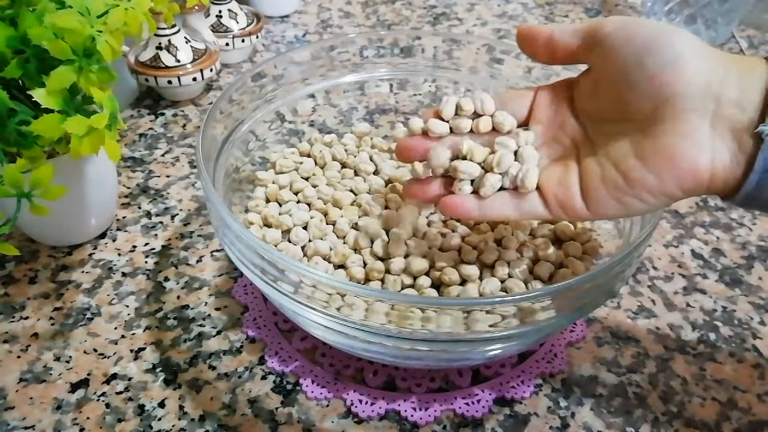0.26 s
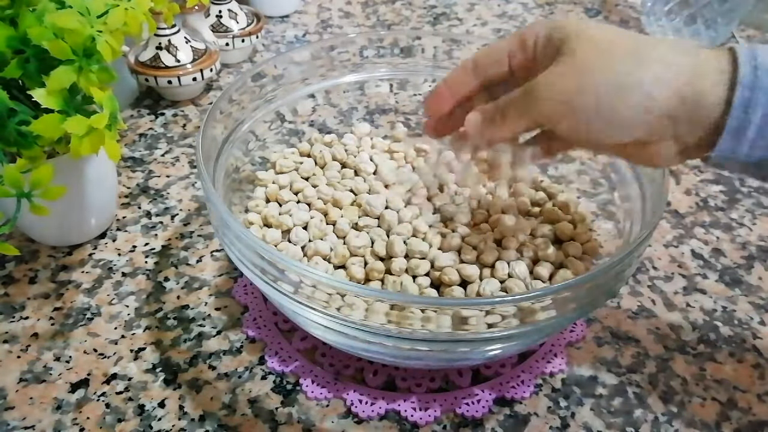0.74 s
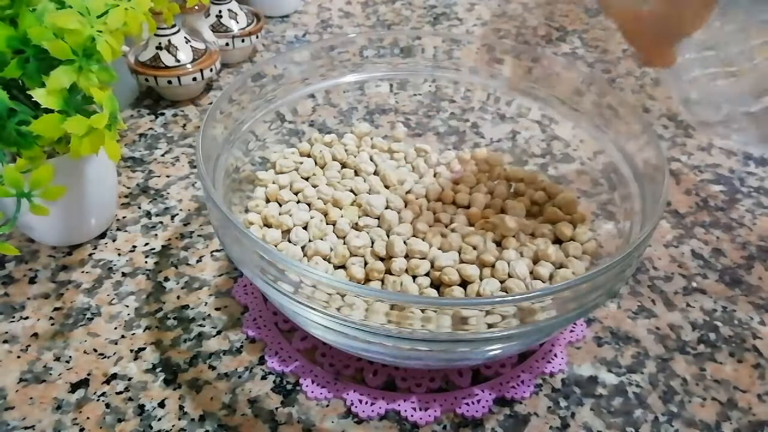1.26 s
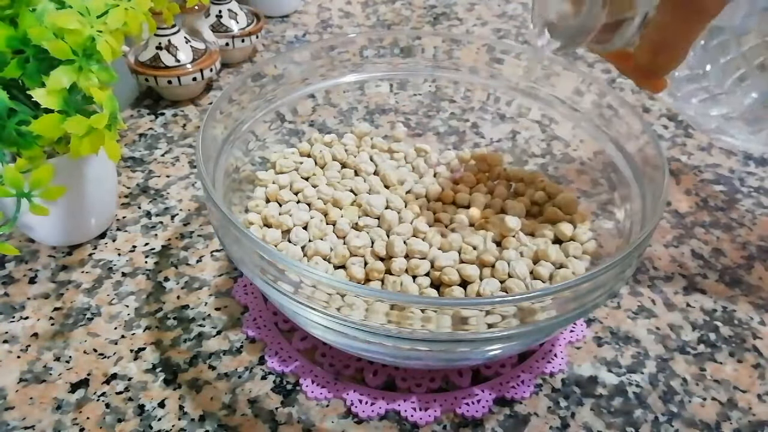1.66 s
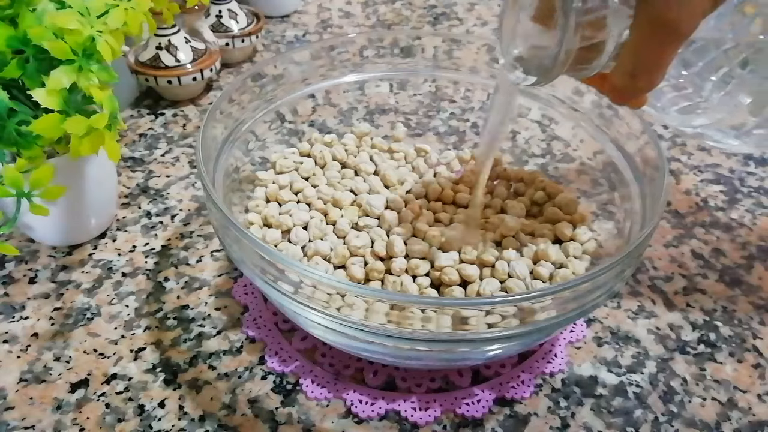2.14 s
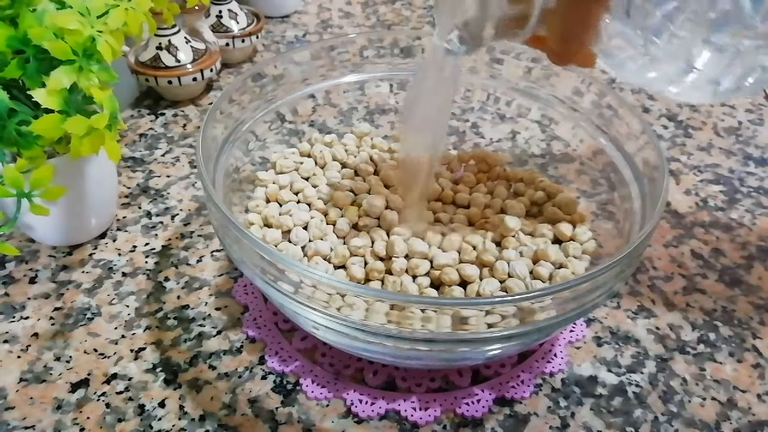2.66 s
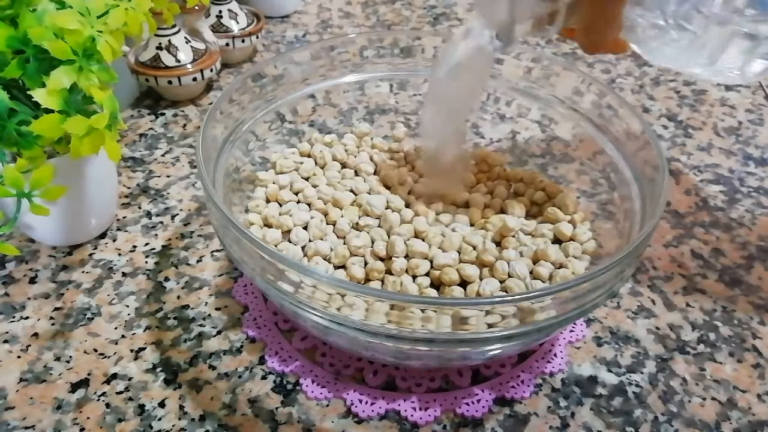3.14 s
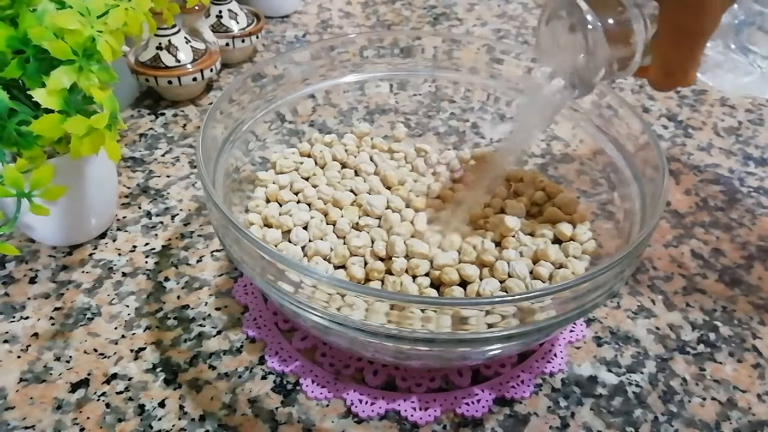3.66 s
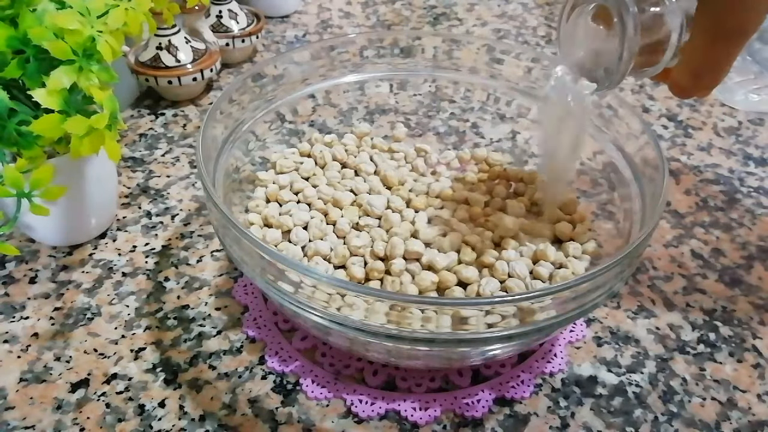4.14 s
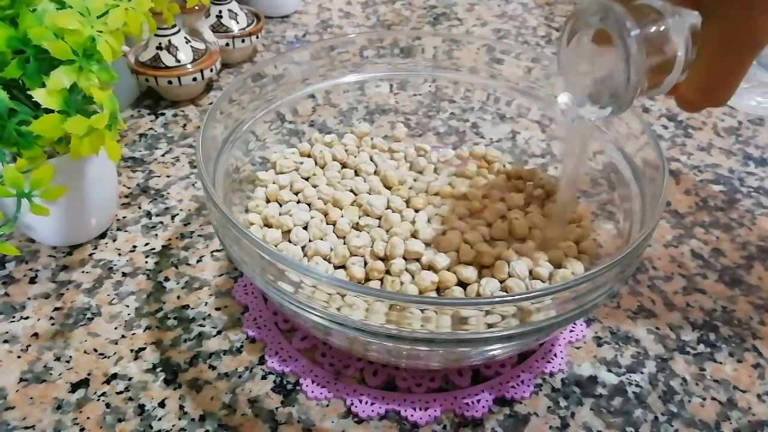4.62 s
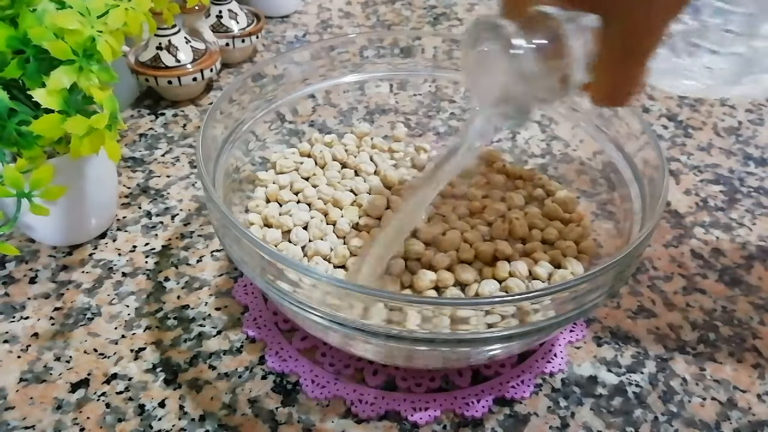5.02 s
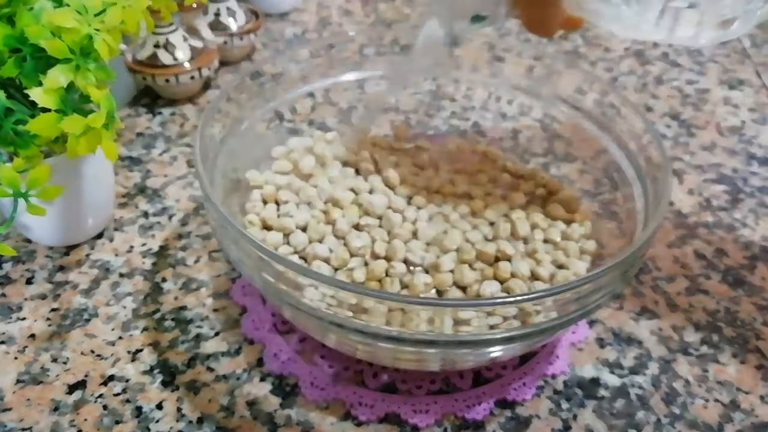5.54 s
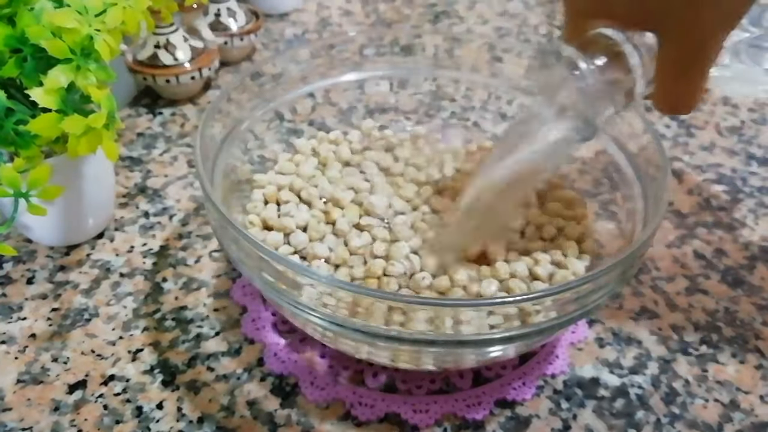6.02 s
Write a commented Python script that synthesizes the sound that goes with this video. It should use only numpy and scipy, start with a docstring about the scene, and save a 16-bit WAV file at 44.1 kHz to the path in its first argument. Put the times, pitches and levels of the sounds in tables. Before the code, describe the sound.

In a small quiet kitchen, a handful of dried chickpeas drops with short dry rattles into a glass bowl. After near silence, a plastic bottle begins to glug, knocks the rim with a bright ringing clink, and water patters and fizzes over the peas in quick pulses, with sharp clicks of shifting peas. Close stereo pickup, treble leaning strongly left.

```python
"""Over faint hiss, dried chickpeas drop from a hand into a glass bowl: short coloured noise bursts.
Water from a plastic bottle then patters, fizzes and burbles on them: random grains, swelling in slugs.
The bottle glugs as air gulps in (throbs, pops, rising gurgles); wet peas shift with clicks.
It knocks on the rim in a few quick bounces: noise for the bottle, ringing modes for the bowl.
A two-port microphone in a small quiet kitchen hears the treble mostly on the left."""
import sys
import numpy as np
from scipy import signal
from scipy.fft import rfft, irfft, next_fast_len
from scipy.io import wavfile
from scipy.ndimage import uniform_filter1d

SR = 44100
rng = np.random.default_rng(int(sys.argv[2]) if len(sys.argv) > 2 else 0)


def dump(signal):
    """Clip the signal to [-1, 1] and save it as 16-bit WAV at the path in sys.argv[1]."""
    limited = np.clip(np.atleast_2d(signal).T, -1, 1)
    pcm = np.round(limited * 32767).astype(np.int16)
    wavfile.write(sys.argv[1], SR, pcm)


N = 277389
TIME = np.arange(N) / SR   # s

# air gulps through the bottle neck:
# (t/s, pop relative level/dB, pop f/Hz, snap relative level/dB, gurgle relative level/dB)
GULPS = [(1.9212, -46.5, 264, -37, -53), (2.1908, -45, 295, -37, -65), (2.715, -37, 326, -36, -56),
         (2.9843, -38.5, 298, -32.5, -53), (3.199, -37, 295, -27.5, -49), (3.408, -46, 295, -32.5, -58),
         (3.641, -37.5, 300, -45, -54), (3.8457, -34.5, 284, -30, -49), (4.052, -40, 285, -55, -53.5),
         (4.302, -35.5, 230, -34.5, -52.5), (4.55, -33.5, 129, -48, -48.5), (4.804, -42.5, 202, -53, -61),
         (5.0319, -41.5, 348, -28, -66), (5.258, -33, 263, -39, -50.5), (5.538, -41, 202, -37.5, -57),
         (5.787, -45, 130, -58, -64), (5.943, -36.5, 384, -50, -77), (6.0664, -39, 413, -51, -53.5),
         (6.161, -30, 440, -36, -48), (6.2875, -31.5, 457, -22.5, -60)]
# slugs of water that land on the peas after the gulps:
# (t/s, length/s, patter relative level/dB, bubbling relative level/dB, bubble f/Hz)
WATER_SLUGS = [(2.777, 0.016, -52, -82, 1870), (2.854, 0.086, -49, -67, 1900),
               (3.021, 0.21, -47, -59.5, 1780), (3.274, 0.15, -43, -61, 1810),
               (3.514, 0.11, -45.5, -68, 1750), (3.637, 0.203, -46, -65.5, 1730),
               (3.926, 0.15, -48, -61, 1720), (4.111, 0.21, -49.5, -63.5, 1910),
               (4.383, .12, -45, -51.5, 1480), (4.627, 0.194, -50.5, -56, 1473),
               (4.914, 0.086, -52.5, -57, 2300), (5.151, 0.12, -40.5, -44.5, 1420),
               (5.32, 0.13, -42.5, -51, 1570), (5.532, 0.13, -47, -61, 1780),
               (5.66, 0.17, -48.5, -50.5, 1660), (5.82, 0.092, -43, -49.5, 2870),
               (5.982, 0.05, -44, -49.5, 2100), (6.089, 0.056, -44.5, -53, 2100),
               (6.193, 0.13, -41.5, -51, 2900)]
# colour of water and wet peas: (f/Hz, relative level/dB per Hz)
WET_SPECTRUM = [(410, -21), (700, -11), (1000, -13), (1270, -10), (1550, -26), (1770, -37), (2530, -12),
                (2880, -13), (3280, -10.5), (4690, -8.5), (6310, -3), (7820, -1), (10700, -5), (11400, -12),
                (12000, -26), (15600, -82), (22000, -120)]
# bounces of the bottle neck on the rim: (t/s, relative level/dB)
RIM_BOUNCES = [(2.3742, -2), (2.3777, -7), (2.3805, 1), (2.3835, -17)]


def from_db(db):
    """Decibels to gain."""
    return 10 ** (np.asarray(db) / 20)


def rms_one(x):
    """Scale to rms 1."""
    return x / np.sqrt(np.mean(x ** 2) + 1e-20)


def at_hz(points, hz):
    """Read a table on a log-frequency axis."""
    f, value = np.transpose(points)
    return np.interp(np.log(np.maximum(hz, 1)), np.log(f), value)


def add(out, s, sound):
    """Mix a short sound in at time s."""
    start = int(round(s * SR))
    out[start:start + len(sound)] += sound[:max(N - start, 0)]


def colour(x, spectrum, size=4096):
    """Causal (minimum-phase) filter with the given spectrum; white noise keeps its power."""
    gain = rms_one(from_db(at_hz(spectrum, np.arange(size // 2 + 1) * SR / size)))
    cepstrum = irfft(np.log(gain))
    # fold the cepstrum forward in time to get minimum phase
    cepstrum[1:size // 2] *= 2
    cepstrum[size // 2 + 1:] = 0
    response = irfft(np.exp(rfft(cepstrum)))
    return signal.oaconvolve(x, response)[:len(x)]


def band(x, low_hz, high_hz):
    """Gentle band-pass."""
    return signal.sosfilt(signal.butter(2, [low_hz, high_hz], "band", fs=SR, output="sos"), x)


def peak(x, hz, width_hz):
    """The part of a sound inside one resonance, gain 1 on top."""
    return signal.lfilter(*signal.iirpeak(hz, hz / width_hz, fs=SR), x)


def ring(clicks, hz, t60):
    """A unit click sets a decaying sine of starting height 1 ringing."""
    radius = from_db(-60 / (t60 * SR))
    w = 2 * np.pi * hz / SR
    return signal.lfilter([0, np.sin(w)], [1, -2 * radius * np.cos(w), radius * radius], clicks + 1e-18)


def fade(t, t60):
    """Exponential decay, 60 dB down at t60 seconds."""
    return np.exp(-np.log(1000) * t / t60)


def burst(t60):
    """Noise that dies away, starting at rms 1."""
    t = TIME[:min(int(t60 * SR) + 2, SR)]
    return rng.standard_normal(len(t)) * fade(t, t60)


def evened(x, size=4000):
    """Hold the rms over about a tenth of a second near 1."""
    power = np.maximum(uniform_filter1d(x ** 2, size), 0)
    return x / np.sqrt(power + 1e-3 * np.mean(x ** 2))


def drift(rate):
    """Slow chance with spread 1, reaching a new value `rate` times a second."""
    return np.interp(TIME * rate, np.arange(4000), rng.standard_normal(4000))


def uneven_sizes(spread_db):
    """Impact heights with a long tail of strong ones."""
    return from_db(spread_db * np.minimum(rng.exponential(1, N), 4))


def grains(per_s, spread_db, pitches, cycles, weight):
    """Random impacts of uneven size, each ringing a few cycles at one of the pitches; slow level evened."""
    sizes = uneven_sizes(spread_db) * rng.choice([-1, 1], N)
    born = rng.random(N) < per_s / SR
    dealt = rng.integers(0, len(pitches), N)
    out = np.zeros(N)
    for k, hz in enumerate(pitches):
        at = np.flatnonzero(born & (dealt == k))
        clicks = np.zeros(N)
        clicks[at] = sizes[at] * weight(at / SR, hz)
        out += ring(clicks, hz, cycles / hz) * np.sqrt(hz)
    return evened(out)


def glides(rows, bend, droop_db, wobble, uneven_db, count=9):
    """Air pockets ring like springs; pitch bends as they change size, and sloshing makes them waver."""
    out = np.zeros(N)
    knots = np.linspace(0, 1, count)
    for s, db, start_hz, end_hz, length in rows:
        u = np.linspace(0, 1, int(length * SR))   # share of the glide that has passed
        in_pitch, in_level = (np.interp(u, knots, row) for row in rng.standard_normal((2, count)))
        hz = (start_hz + (end_hz - start_hz) * u ** bend) * np.exp(wobble * in_pitch * u)
        level = from_db(db - droop_db * u + uneven_db * in_level)
        edges = np.clip(u * 20, 0, 1) * np.clip((1 - u) * 5, 0, 1)
        add(out, s, level * edges * np.sin(2 * np.pi * np.cumsum(hz) / SR))
    return out


def background(level_db):
    """Faint hiss, different in each channel, over a shared low murmur of the room."""
    # colour of the background: (f/Hz, relative level/dB per Hz)
    hiss_spectrum = [(15, -32), (25, -2.5), (102, -4.5), (180, -3.5), (210, -9.5), (478, -8.5), (529, -10),
                     (819, -16.5), (1270, -15.5), (2660, -19), (5470, -15), (6540, -15), (7440, -7),
                     (9860, -21), (11500, -44.5), (15000, -85.5), (22000, -120)]
    # the background sinks away and comes back: (t/s, relative level/dB)
    hiss_course = [(0, -71.5), (1.12, -74.5), (1.3, -95), (1.6, -102), (1.785, -110), (1.795, -74),
                   (6.29, -65.5)]
    noise = rng.standard_normal((3, N))
    low_pass = signal.butter(2, 900, fs=SR)
    high_pass = signal.butter(2, 900, "high", fs=SR)
    murmur = signal.lfilter(*low_pass, noise[2])
    channels = []
    for own in noise[:2]:
        hiss = np.sqrt(2) * signal.lfilter(*high_pass, own)
        channels.append(colour(murmur + hiss, hiss_spectrum))
    return np.array(channels) * from_db(level_db + np.interp(TIME, *np.transpose(hiss_course)))


def shower(s, length, db, scatter_db, count):
    """Peas fall one after another at uneven moments: rows of (t/s, relative level/dB)."""
    chance = rng.uniform(-1, 1, (count, 2))
    times = s + length * (np.arange(count) + .5 + .5 * chance[:, 0]) / count
    return list(zip(times, db + scatter_db * chance[:, 1]))


def peas(dry_db, dry_t60, wet_db, wet_t60, pitched_db, ring_t60):
    """Dry peas land with a short rattle of noise; wet ones click and ring for an instant."""
    # the hand lets peas go in little showers: (t/s, length/s, relative level of each pea/dB)
    handfuls = [(0.264, 0.31, -52.5), (0.896, 0.091, -54), (0.986, .07, -34)]
    # single dry peas landing: (t/s, relative level/dB)
    single_drops = [(0.3799, -34.5), (0.4468, -44.5), (0.9912, -34), (1.0055, -30.5), (1.108, -36.5)]
    # the loudest knocks of wet peas under the stream: (t/s, relative level/dB, centre f/Hz)
    wet_knocks = [(1.964, -37, 7630), (2.2169, -34, 6000), (2.7834, -29.5, 7280), (2.8759, -38, 7240),
                  (2.9474, -30.5, 5060), (3.118, -30.5, 8400), (3.2008, -24.5, 7580), (3.2928, -19, 8220),
                  (3.4033, -27, 7720), (3.5367, -31, 7220), (3.6238, -26, 7450), (3.6615, -21.5, 7870),
                  (3.7539, -30, 7340), (3.846, -28.5, 7800), (3.996, -27, 7370), (4.156, -26, 6330),
                  (4.2873, -28.5, 8230), (4.3869, -23.5, 8410), (4.637, -33.5, 6860), (4.6538, -20.5, 8230),
                  (4.7536, -21.5, 7760), (4.957, -25.5, 7280), (5.1357, -27.5, 7420), (5.214, -25.5, 7460),
                  (5.439, -21.5, 7200), (5.6257, -22.5, 6930), (5.7919, -25.5, 8530),
                  (5.8456, -21.5, 10500), (5.9512, -21.5, 5700), (6.1929, -27, 7500)]
    # colour of dry peas on glass: (f/Hz, relative level/dB per Hz)
    dry_spectrum = [(100, -36), (250, -13.5), (600, -21), (1400, -24.5), (2400, -24), (3200, -11.5),
                    (4000, -16.5), (6300, -11.5), (7350, 1), (8500, -9.5), (10700, -15.5), (12000, -34.5)]
    dry_peas, wet_peas = np.zeros((2, N))
    falling = [pea for row in handfuls for pea in shower(*row, scatter_db=0.5, count=9)]
    for s, db in single_drops + falling:
        add(dry_peas, s, from_db(db + dry_db) * burst(dry_t60))
    for s, db, hz in wet_knocks:
        click = np.pad(burst(wet_t60), (0, SR // 50))   # room for the ring to die away
        tone = ring(click, hz, ring_t60)
        tone = tone * click.std() / tone.std()
        add(wet_peas, s, from_db(db + wet_db) * (click + from_db(pitched_db) * tone))
    return colour(dry_peas, dry_spectrum) + colour(wet_peas, WET_SPECTRUM)


def flow():
    """Strength of patter and of bubbling: the trickle plus slugs that swell, hold and drain away."""
    # the thin stream that runs on between the slugs: (t/s, patter relative level/dB)
    trickle = [(1.9, -105), (1.95, -76), (2.5, -60.5), (2.9, -54), (4.6, -54), (6.29, -53.5)]
    attack_s, release_s = 0.021, 0.033
    # strengths add as power
    patter = from_db(np.interp(TIME, *np.transpose(trickle), left=-np.inf)) ** 2
    bubbling = patter * from_db(-11.5) ** 2   # the trickle bubbles more softly than it patters
    for s, length, patter_db, bubbling_db, _ in WATER_SLUGS:
        swell = np.clip((TIME - s) / attack_s, 0, 1)
        drain = np.exp(-np.clip(TIME - s - length, 0, 1) / release_s)
        patter = patter + (from_db(patter_db) * swell * drain) ** 2
        bubbling = bubbling + (from_db(bubbling_db) * swell * drain) ** 2
    return np.sqrt(patter), np.sqrt(bubbling)


def burble(per_s, spread_db, octaves, cycles):
    """Bubbles crowd around the pitch that the pool favours at each moment."""
    start, length, *_, pool_hz = np.transpose(WATER_SLUGS)

    def favoured(s, hz):
        """Weight of a bubble by its distance in pitch from the pool."""
        centre_hz = np.interp(s, start + length / 2, pool_hz)
        return 1 / (1 + (np.log2(hz / centre_hz) / octaves) ** 2)

    bubbles = grains(per_s, spread_db, np.geomspace(1170, 3600, 36), cycles, favoured)
    return evened(band(bubbles, 880, 5300))


def stream(patter_db, crackle_db, bubbling_db, wash_db, clump_db, clump_rate):
    """Droplets crackle on the peas, tiny bubbles fizz, larger ones burble."""
    # finer spray when the stream nears the glass:
    # (t/s, gain of the top treble/dB, gain of the middle treble/dB)
    spray_course = [(2.6, -2.5, 1), (4.0, -10, -1.5), (5.2, -13.5, 4), (5.75, -6, 4), (5.88, 6, 3),
                    (6.29, -3, -4)]
    patter_flow, bubbling_flow = flow()
    busy = np.sqrt(patter_flow / patter_flow.max())   # a stronger splash throws more droplets
    fizz = grains(2400 * busy, spread_db=4.0, pitches=np.linspace(2200, 11600, 44), cycles=79,
                  weight=lambda s, hz: 1)
    droplets = (rng.random(N) < 700 * busy / SR) * rng.standard_normal(N) * uneven_sizes(5.8)
    patter = from_db(patter_db) * evened(colour(fizz, WET_SPECTRUM))
    patter = patter + from_db(crackle_db) * evened(colour(droplets, WET_SPECTRUM))
    patter = patter * from_db(clump_db * drift(clump_rate))   # the jet breaks into lumps
    wash = from_db(wash_db) * colour(rng.standard_normal(N), WET_SPECTRUM)
    splash = patter_flow * (patter + wash)
    s, top_db, middle_db = np.transpose(spray_course)
    splash = splash + (from_db(np.interp(TIME, s, top_db)) - 1) * peak(splash, 10800, 2400)
    splash = splash + (from_db(np.interp(TIME, s, middle_db)) - 1) * peak(splash, 3500, 2400)
    bubbles = burble(2000 * busy, spread_db=5.0, octaves=0.53, cycles=20)
    return splash + bubbling_flow * from_db(bubbling_db) * bubbles


def bottle_air(s):
    """Throb and gurgle of the air in the bottle at the tilt of that moment."""
    # how far the bottle is tipped: (t/s, tilt/0-1)
    tilt_course = [(1.92, 0.01), (2.2, 0.34), (2.9, 0.5), (4.05, 0.59), (4.3, 0.8), (5.79, 0.81), (5.94, 1)]
    # over most of its tipping, a steeper bottle gurgles shorter and higher: (tilt/0-1, throb relative
    # level/dB, throb length/s, throb top f/Hz, gurgle length/s, gurgle start f/Hz, gurgle end f/Hz)
    air_by_tilt = [(0, -80, 0.034, 109, 0.197, 113.3, 153), (0.507, -55, 0.199, 81.3, .076, 177, 528),
                   (0.806, -46.5, .04, 110, .04, 200, 330), (1, -46, 0.015, 198, 0.026, 243, 563)]
    tilts, *columns = np.transpose(air_by_tilt)
    tilt = np.interp(s, *np.transpose(tilt_course))
    return [np.interp(tilt, tilts, column) for column in columns]


def rounded(pop, edge_hz):
    """The neck takes the top off a pop and lets it ring for an instant."""
    edge_hz = np.clip(edge_hz, 400, 2000)
    return signal.sosfilt(signal.cheby1(4, 1, edge_hz, fs=SR, output="sos"), pop)


def glugs(neck_hz, neck_t60, low_share, spray_db, edge_ratio):
    """The air in the bottle throbs upward in pitch until a gulp breaks through the neck with a pop."""
    out, snaps, spray = np.zeros((3, N))
    t = np.arange(-SR // 4, SR // 50) / SR   # s from the gulp
    for s, pop_db, pop_hz, snap_db, _ in GULPS:
        swell_db, swell_s, top_hz, *_ = bottle_air(s)
        swell = np.exp(np.minimum(t, 0) / swell_s)
        turns = np.cumsum(top_hz * (low_share + (1 - low_share) * swell ** 2)) / SR
        cut_off = np.exp(-np.maximum(t, 0) / 0.00092)
        throb = swell * cut_off * -np.sin(2 * np.pi * (turns - turns[SR // 4]))
        w = 2 * np.pi * pop_hz * t
        pop = -2 * w / (1 + w * w) * np.exp(-(w / 5) ** 2)   # pressure up, then sharply down
        pop = rounded(pop, edge_ratio * pop_hz)
        add(out, s + t[0], from_db(swell_db) * throb + from_db(pop_db) * pop)
        add(snaps, s, from_db([snap_db]))
        add(spray, s, from_db(snap_db + spray_db) * burst(0.0047))
    return out + ring(snaps, neck_hz, neck_t60) + colour(spray, WET_SPECTRUM)


def gurgles():
    """Each gulp leaves an air pocket that rings upward in pitch, ever faster."""
    pockets = []
    for s, *_, db in GULPS:
        *_, length, start_hz, end_hz = bottle_air(s)
        pockets.append((s + 0.0021, db, start_hz, end_hz, length))
    return glides(pockets, bend=2.6, droop_db=2.5, wobble=.07, uneven_db=2.2)


def knock(crack_db, crack_t60, clatter_db, clatter_t60):
    """The bottle bounces on the rim: a crack at each bounce and one shudder of its thin wall."""
    # colour of the cracks: (f/Hz, relative level/dB per Hz)
    crack_spectrum = [(35, -16), (60, -15.5), (265, -4), (370, -13.5), (643, -6.5), (938, -15.5),
                      (1090, -6.5), (1560, -20.5), (1950, -12), (2720, -24), (4230, -15), (6310, -19),
                      (7700, -5), (10300, -21.5), (12000, -37), (15600, -73), (22000, -120)]
    # colour of the shuddering wall: (f/Hz, relative level/dB per Hz)
    clatter_spectrum = [(29, -34), (50, -22), (128, -5), (343, -25), (637, -9), (1300, -34), (1520, -52),
                        (1960, -13.5), (2770, -33), (2960, -18), (6170, -50), (7940, -18.5), (12000, -37),
                        (15600, -56), (22000, -120)]
    crack, clatter = np.zeros((2, N))
    for s, db in RIM_BOUNCES:
        add(crack, s, from_db(db + crack_db) * burst(crack_t60))
    add(clatter, RIM_BOUNCES[0][0], from_db(clatter_db) * burst(clatter_t60))
    return colour(crack, crack_spectrum) + colour(clatter, clatter_spectrum)


def glass_bowl():
    """The bowl, struck at the second bounce, rings on its stand as a sum of decaying modes."""
    # modes of the glass: (f/Hz, relative level/dB, t60/s)
    bowl_modes = [(64.7, -40, 0.76), (125, -32, 0.45), (240, -42, 0.37), (322, -28, 0.079),
                  (419, -35, 0.17), (446, -37.5, 0.16), (630, -54, 0.3), (750, -46, 0.26),
                  (1008, -40, 0.26), (1913, -27.5, 0.33), (2906, -43.5, 0.48), (3480, -59, 0.22),
                  (3600, -62, 0.24), (4170, -45.5, 0.41), (4540, -54, 0.098), (5570, -40, 0.26),
                  (5600, -41, 0.14), (6890, -32, 0.14), (7040, -44, 0.39), (8070, -29.5, 0.14),
                  (7840, -49.5, 0.77), (8650, -27, 0.13), (9700, -42, 0.15), (10530, -34.5, 0.15)]
    blow = np.zeros(N)
    add(blow, RIM_BOUNCES[1][0], np.ones(1))
    out = np.zeros(N)
    for k, (hz, db, t60) in enumerate(bowl_modes):
        out += ring(blow, hz, t60) * from_db(db) * (-1) ** k   # neighbours start in opposite phase
    return out


def surface_bubbles():
    """Single bubbles under the stream ring as short gliding sines, some up and some down."""
    # (t/s, relative level/dB, start f/Hz, end f/Hz, length/s)
    single_bubbles = [(3.093, -37.5, 1357, 1162, 0.022), (3.414, -34, 1735, 1795, 0.019),
                      (3.423, -32, 1910, 1660, 0.0066), (4.806, -40.5, 1810, 1660, 0.016),
                      (5.033, -41.5, 2310, 2350, 0.0091), (5.259, -38, 1220, 1160, 0.013),
                      (5.777, -44, 1210, 1620, 0.0062), (5.865, -36.5, 2190, 2380, 0.0068),
                      (6.128, -35, 2620, 3330, 0.01)]
    return glides(single_bubbles, bend=0.81, droop_db=6, wobble=0.018, uneven_db=2.0)


def kitchen(x, bowl_db, bowl_t60, room_db):
    """Quick reflections inside the bowl, then a room tail that dies soonest in the high treble."""
    # decay of the room: (f/Hz, t60/s)
    room_decay = [(100, 0.56), (500, 0.72), (2000, 0.38), (8000, 0.34), (12000, 0.073)]
    t = TIME[:SR // 2]
    edges = np.geomspace(50, 13000, 9)   # Hz, borders of the decay bands
    tail = np.zeros(len(t))
    for low, high in zip(edges, edges[1:]):
        t60 = at_hz(room_decay, np.sqrt(low * high))
        tail += band(rng.standard_normal(len(t)), low, high) * fade(t, t60)
    tail = tail * np.minimum(t / 0.013, 1)
    early = band(rng.standard_normal(len(t)) * fade(t, bowl_t60) * (t > .0005), 980, 14000)
    early = early + 0.46 * band(early, 1740, 4040)   # the glass wall throws the middle range back best
    response = from_db(room_db) * tail / np.linalg.norm(tail)
    response = response + from_db(bowl_db) * early / np.linalg.norm(early)
    return x + signal.fftconvolve(x, response)[:N]


def ports(left, right, lag_s):
    """The left port faces the bowl; the right is shaded in the treble and hears it a little later."""
    # (f/Hz, left minus right level/dB)
    balance = [(60, 2), (190, 1), (620, 7), (1120, 7.5), (2010, 14), (3610, 21.5), (6470, 26.5),
               (7800, 31.5), (11000, 19)]
    size = next_fast_len(N + SR // 10)
    hz = np.arange(size // 2 + 1) * SR / size
    shade = from_db(-at_hz(balance, hz))
    delay = np.exp(-2j * np.pi * hz * lag_s)
    gains = 2 / (1 + shade) * np.array([np.ones_like(hz), shade * delay])   # the two gains sum to 2
    return irfft(rfft(np.array([left, right]), size) * gains, size)[:, :N]


def scene():
    """Everything but the background sounds at the bowl, in the kitchen."""
    clicks = peas(dry_db=-9.5, dry_t60=0.051, wet_db=-9, wet_t60=0.012, pitched_db=-4.5, ring_t60=0.011)
    water = stream(patter_db=-6.0, crackle_db=-8, bubbling_db=-5, wash_db=-20.5, clump_db=5.0, clump_rate=70)
    bottle = glugs(neck_hz=2100, neck_t60=0.0033, low_share=0.387, spray_db=-6.5, edge_ratio=2.05)
    bottle = bottle + gurgles()
    rim = knock(crack_db=-16.5, crack_t60=0.025, clatter_db=-35, clatter_t60=0.35)
    bubbles = surface_bubbles()
    at_bowl = clicks + water + bottle + rim + 0.52 * bubbles
    direct = glass_bowl() + 0.3 * bubbles   # these also carry straight to the microphone
    left = kitchen(at_bowl, bowl_db=-13, bowl_t60=0.025, room_db=-11) + direct
    left = left + 0.61 * peak(left, 7740, 340)   # the open port rings a little
    # the shaded port hears more reflections from the bowl
    right = kitchen(at_bowl, bowl_db=2, bowl_t60=0.037, room_db=-11.5) + direct
    return ports(left, right, lag_s=.00005) + background(level_db=5.5)


def record(dry):
    """The loudest peaks are rounded and the top is cut steeply."""
    ceiling = .6   # of full scale
    low_pass = signal.ellip(10, .3, 70, 11900, fs=SR, output="sos")   # cut-off in Hz
    return signal.sosfilt(low_pass, ceiling * np.tanh(dry / ceiling))


dry = scene()
out = record(dry)
dump(out)
```